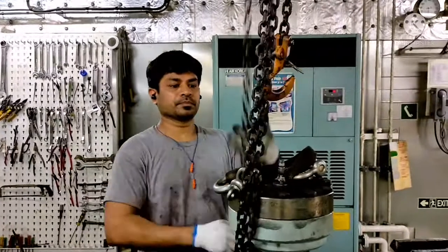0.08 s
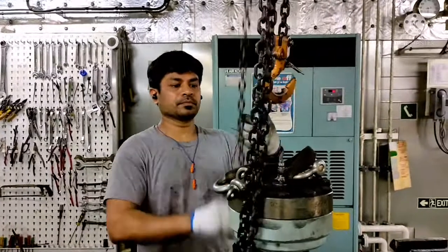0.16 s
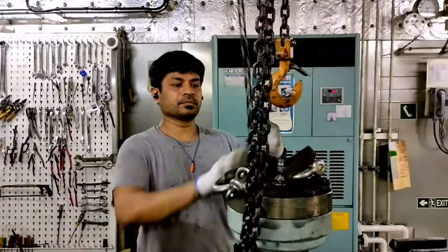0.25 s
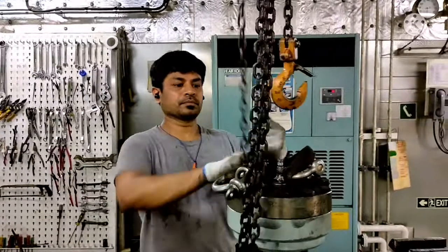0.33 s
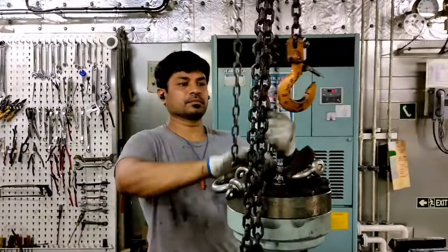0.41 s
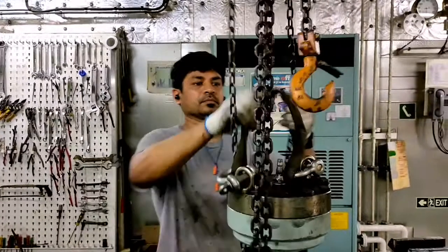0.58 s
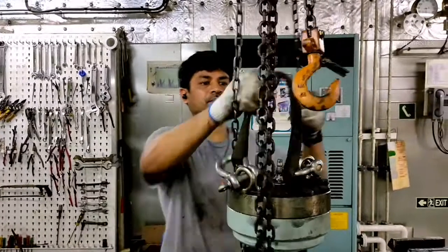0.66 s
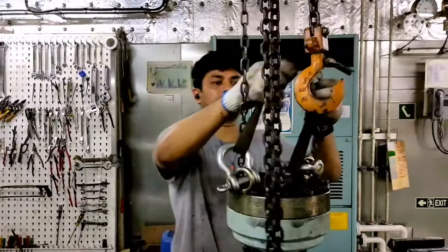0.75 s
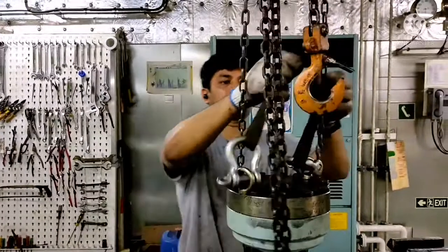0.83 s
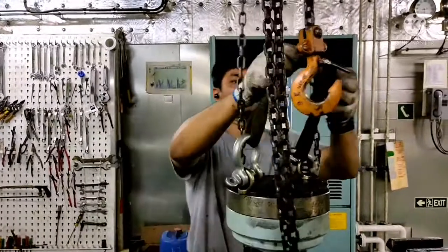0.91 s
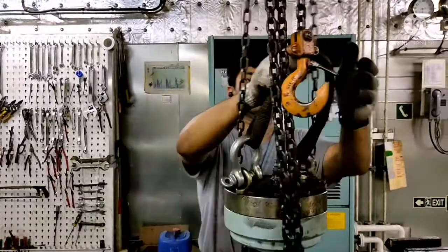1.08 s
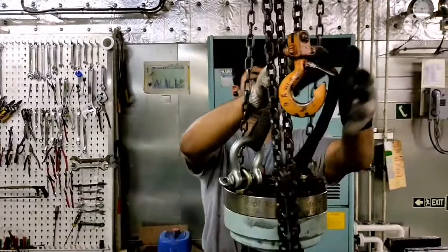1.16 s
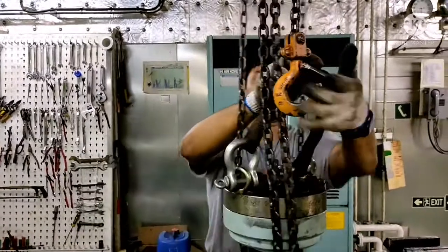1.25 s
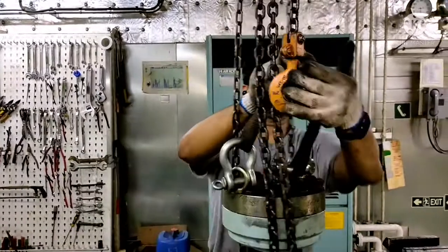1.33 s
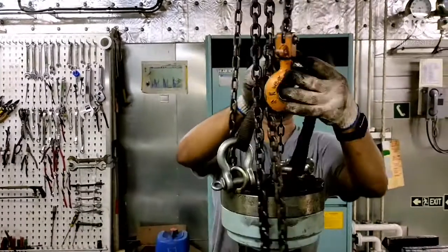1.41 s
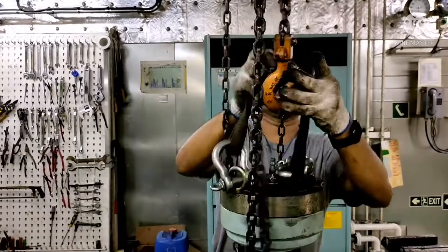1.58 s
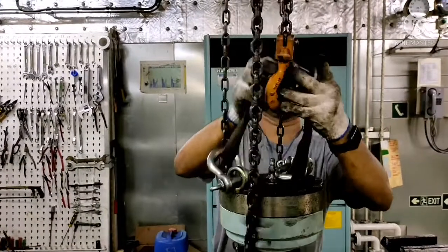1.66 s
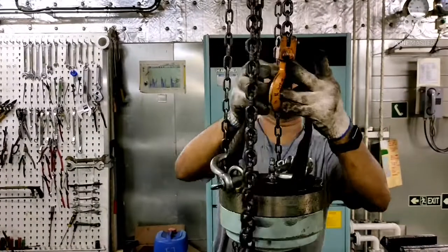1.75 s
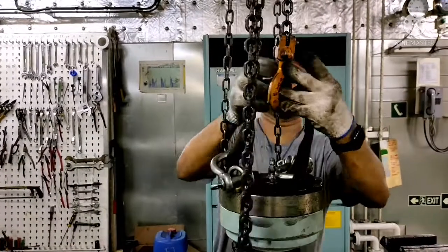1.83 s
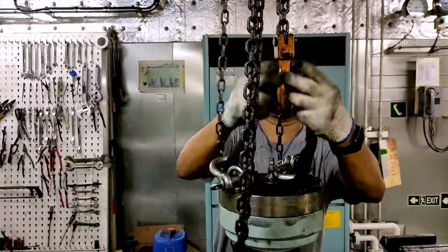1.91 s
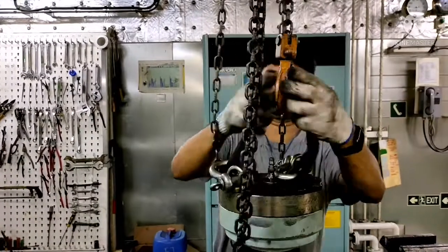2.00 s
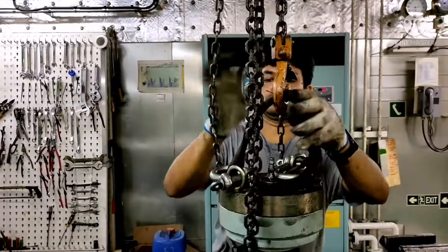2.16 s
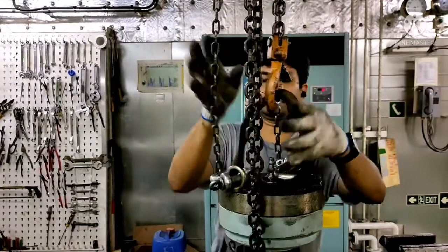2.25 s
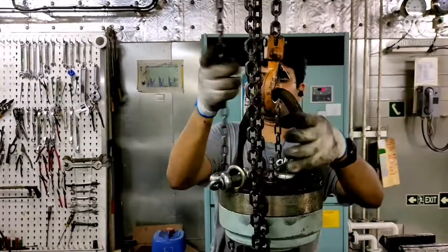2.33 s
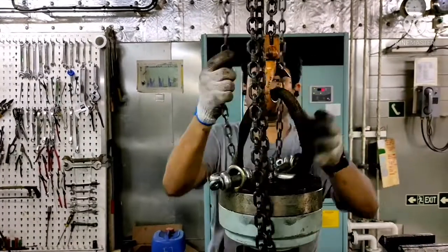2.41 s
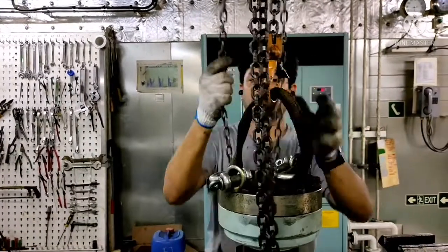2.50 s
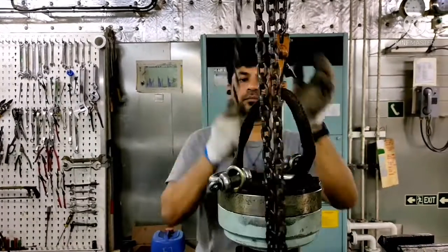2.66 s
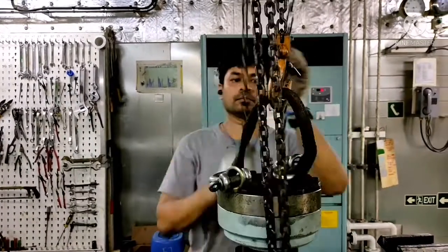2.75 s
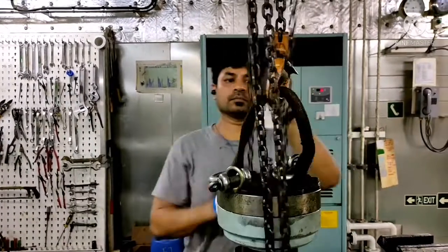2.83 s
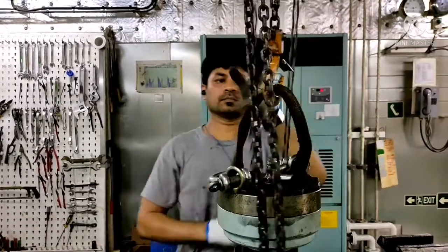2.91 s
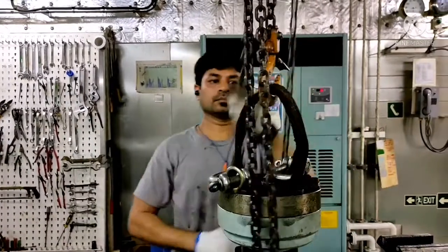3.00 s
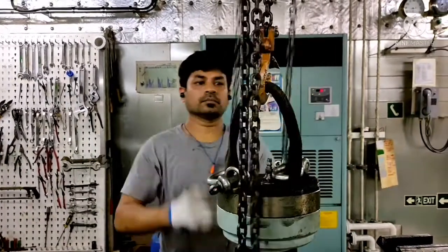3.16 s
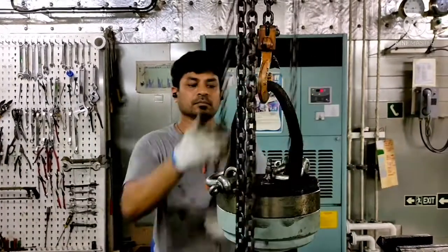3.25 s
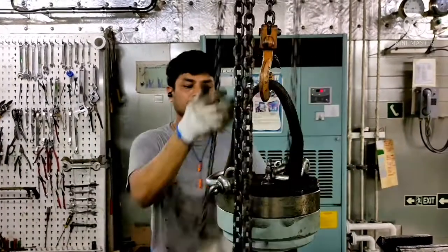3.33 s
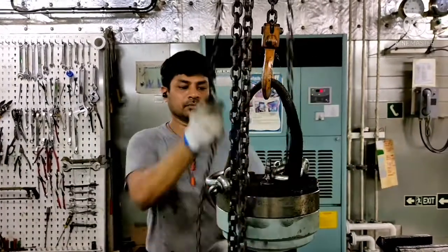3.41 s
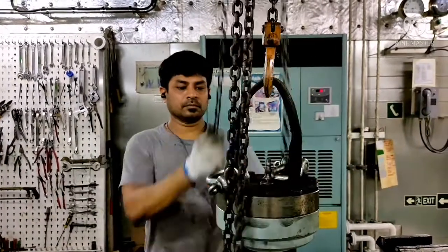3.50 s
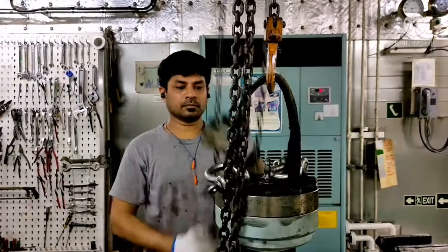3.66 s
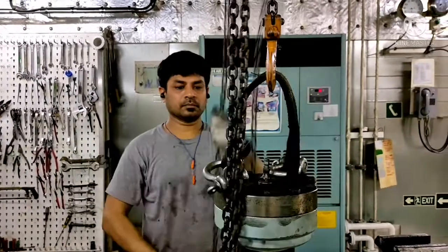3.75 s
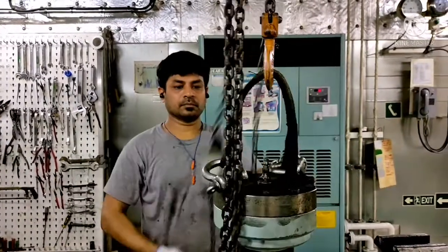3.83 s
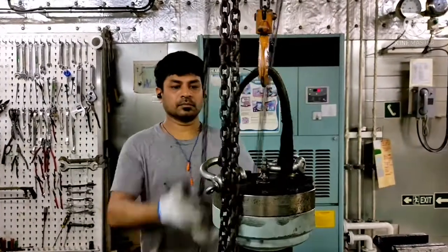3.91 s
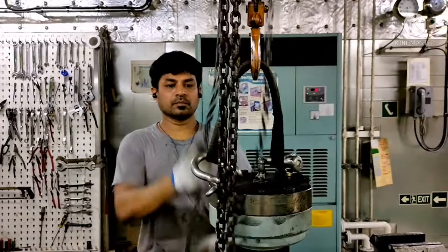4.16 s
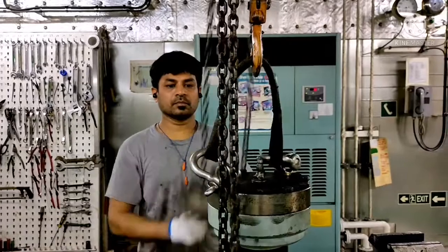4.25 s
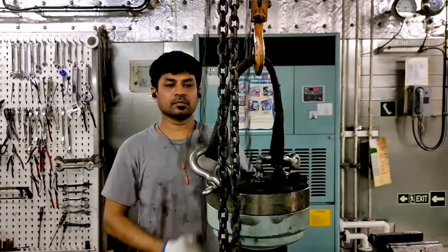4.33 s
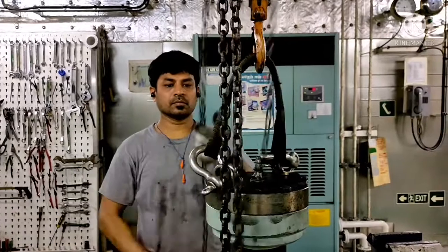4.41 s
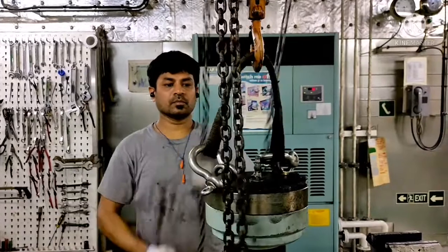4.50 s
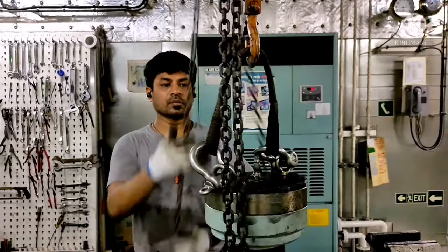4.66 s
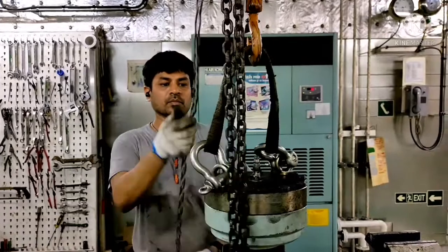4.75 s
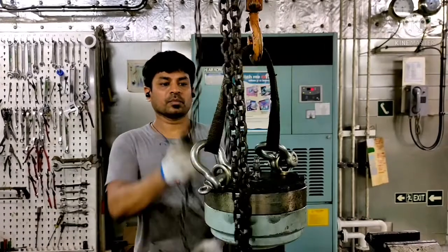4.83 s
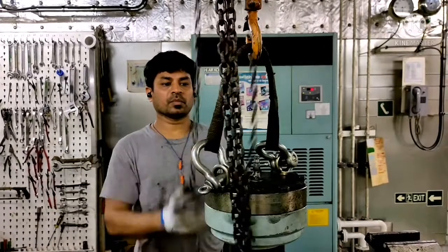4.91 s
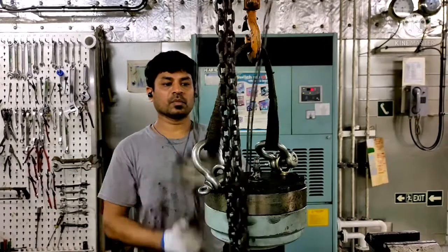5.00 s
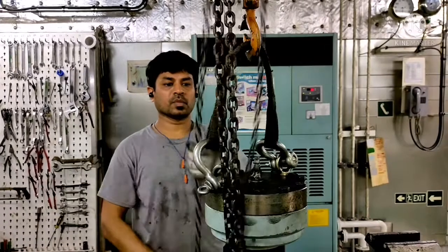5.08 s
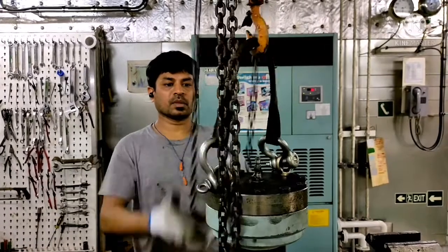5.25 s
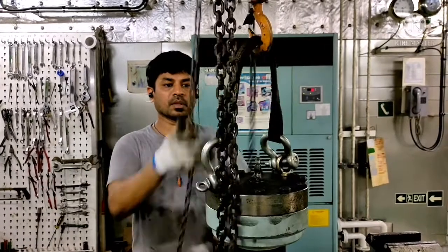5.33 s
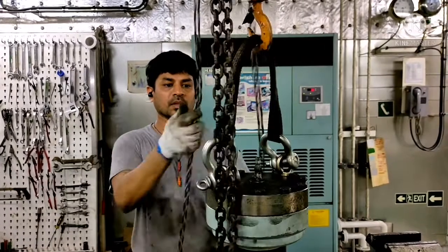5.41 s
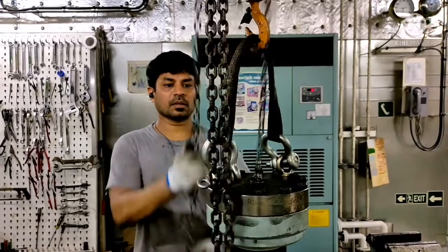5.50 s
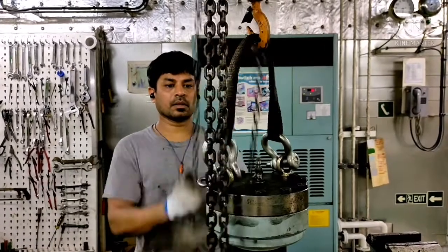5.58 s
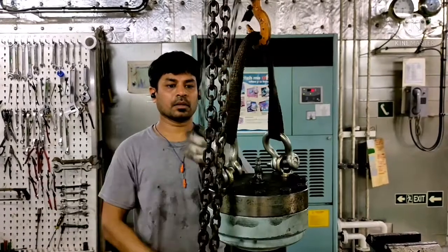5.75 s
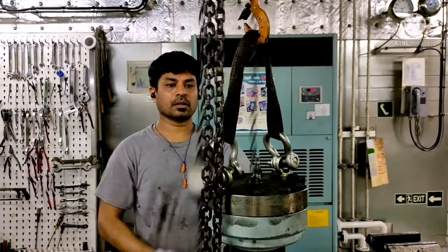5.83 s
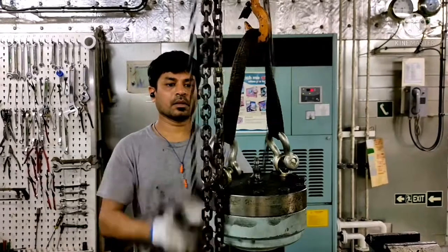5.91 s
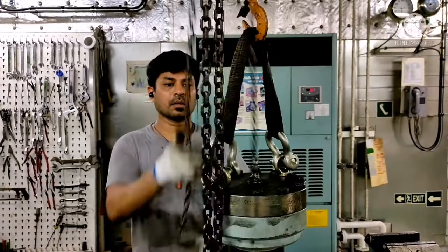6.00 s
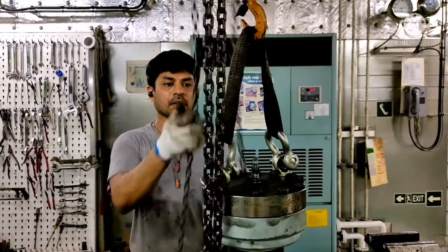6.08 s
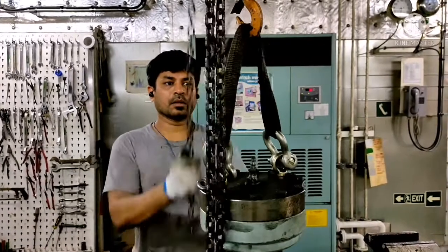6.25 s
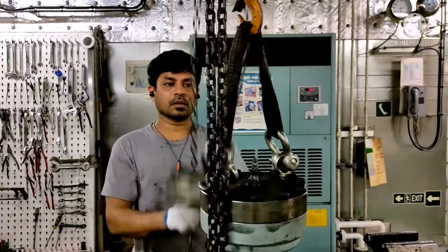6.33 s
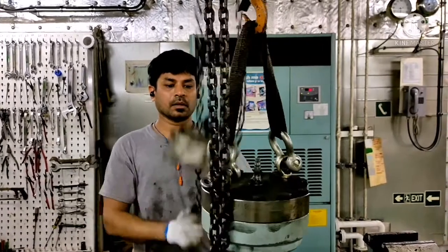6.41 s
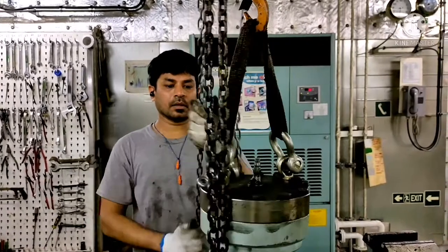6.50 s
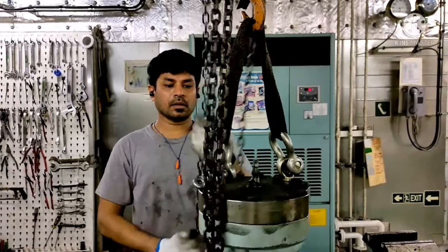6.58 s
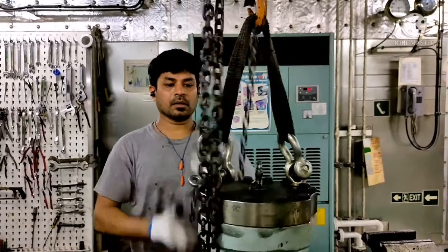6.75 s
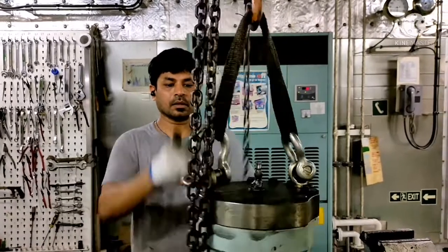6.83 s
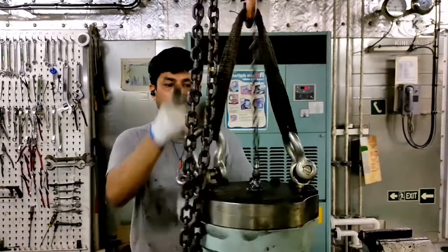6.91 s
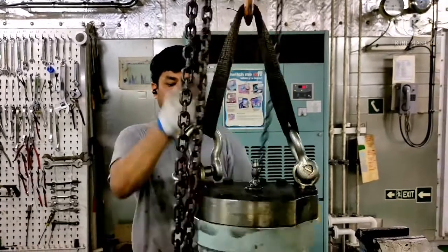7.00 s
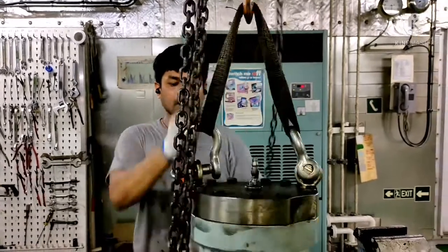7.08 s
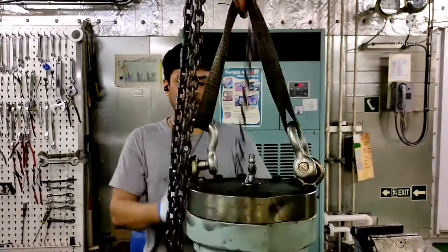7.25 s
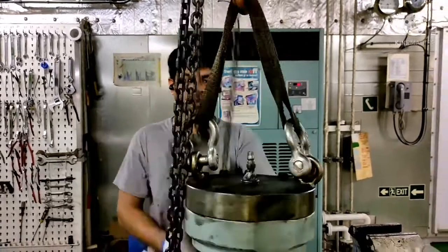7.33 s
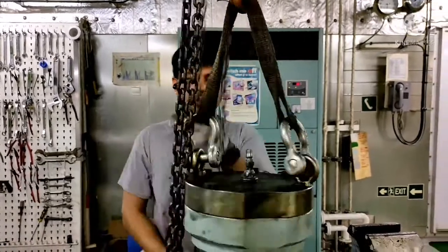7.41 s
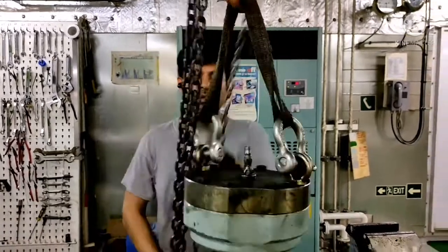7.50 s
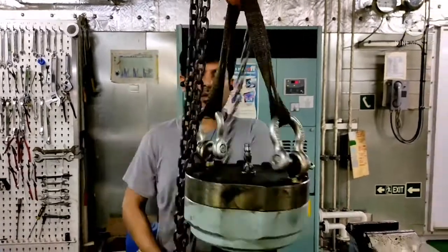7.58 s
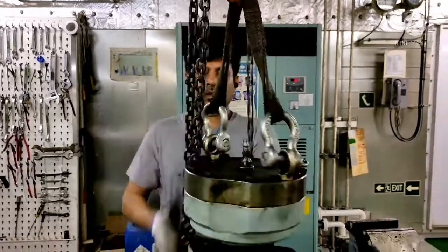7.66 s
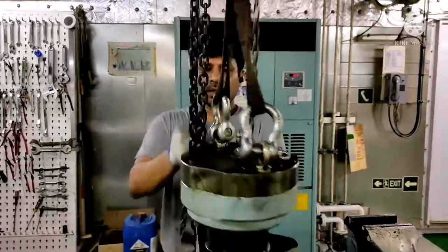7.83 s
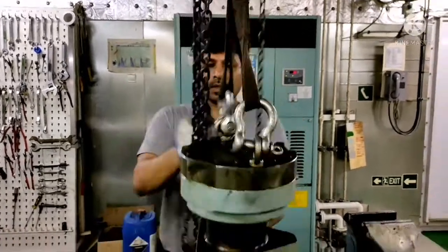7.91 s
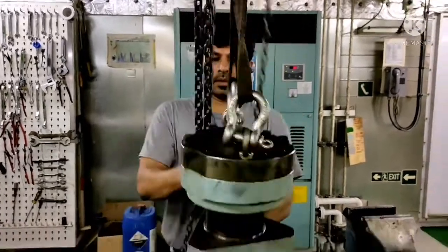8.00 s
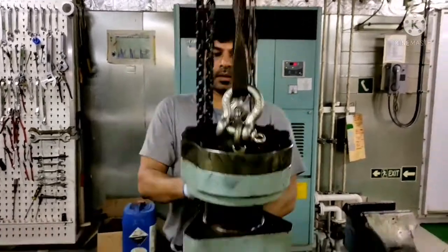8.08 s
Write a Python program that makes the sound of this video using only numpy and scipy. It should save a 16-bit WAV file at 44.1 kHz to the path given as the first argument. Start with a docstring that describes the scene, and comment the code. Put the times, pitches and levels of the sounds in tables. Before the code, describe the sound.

A chain hoist jingles briefly, pauses while hook and shackles clink, then rattles hand over hand over a low ship's machinery hum.

```python
"""A chain hoist runs in a ship's steel workshop, over a diesel generator, motors and vents: summed sines and noise.
First the chain jingles, as random impacts that excite short modes, and slows to a rest. In the pause a sling
is hooked on: hook and shackles clink as decaying modes, slack chain brushes them and the load bumps. Then the
chain is hauled hand over hand: a dense jingle, hollow knocks in the hand wheel's housing from short swelling
sines, and bright clacks of filtered noise as links snap taut."""
import sys
import numpy as np
from scipy import signal
from scipy.fft import rfft, irfft
from scipy.io import wavfile
from scipy.ndimage import uniform_filter1d

SR = 44100
rng = np.random.default_rng(int(sys.argv[2]) if len(sys.argv) > 2 else 0)


def to_wav(sig):
    """Store sig (one row per channel, or 1-D mono) as 16-bit WAV at the path in sys.argv[1].

    Samples outside -1..1 are clipped; the rate is SR.
    """
    pcm = np.clip(np.atleast_2d(sig), -1, 1) * 32767
    pcm = np.round(pcm).astype(np.int16)
    wavfile.write(sys.argv[1], SR, pcm.T)  # frames by channels


N = 359414
T = np.arange(N) / SR
FREQS = np.maximum(np.arange(N // 2 + 1) * SR / N, 1)
SIDES = np.array([[1], [-1]])  # left, right

# The chain runs out, rests and is hauled again: one list per run.
# Each row: time in seconds, jingle level in dB.
HAUL_LEVELS = [
    [(0, -22), (.14, -23), (.37, -31), (.43, -28), (.55, -39), (.68, -51.5), (.8, -65)],
    [(2.54, -54), (2.58, -38.5), (2.6, -38), (2.68, -27), (2.79, -25), (3.21, -21.5), (5.54, -23.5),
     (5.59, -27.5), (5.66, -22), (6.55, -27), (6.77, -32), (6.9, -27), (7.2, -26.5), (7.4, -21.5),
     (7.62, -25), (7.91, -25.5), (7.98, -30), (8.15, -25)],
]
# Pulls that spin the hand wheel. Each row: start in seconds, length in seconds, level in dB.
WHEEL_PULLS = [(0.036, 0.11, -26), (0.405, 0.049, -37.5), (2.758, 0.09, -33.5), (2.857, .23, -29.5),
               (3.242, .23, -28), (3.546, .3, -25.5), (3.892, 0.074, -24), (4.051, .16, -25),
               (4.25, 0.3, -24.5), (4.622, .1, -25), (4.791, 0.053, -24), (4.898, .3, -25),
               (5.311, .22, -25), (5.632, .24, -23), (5.963, 0.13, -25.5), (6.296, 0.03, -35.5),
               (6.46, 0.073, -31.5), (6.73, 0.041, -36), (6.875, .16, -30), (7.257, .1, -30.5),
               (7.388, .31, -33.5), (7.857, .08, -30.5), (8.091, .06, -36.5)]


def undb(db):
    """Decibels are logarithmic: 20 dB is a factor of ten in amplitude."""
    return 10 ** (np.asarray(db) / 20)


def unit(x):
    """Normalization of the signal to a root mean square of one."""
    return x / np.sqrt(np.mean(x ** 2))


def energy(x):
    """Normalization of a stereo impulse response to unit energy per ear, averaged over both ears."""
    return x / np.sqrt(np.sum(x ** 2) / 2)


def curve(points):
    """Linear interpolation in time between (s, value) points."""
    times, values = np.transpose(points)
    return np.interp(T, times, values)


def loudness(tables):
    """Amplitude envelope from (s, dB) tables, silent outside them and smoothed at the edges."""
    gain = 0
    for table in tables:
        active = (T >= table[0][0]) * (T <= table[-1][0] + .01)
        gain = gain + undb(curve(table)) * active
    return np.abs(uniform_filter1d(gain, size=200))


def gestures(table, attack_s, release_s, arch_db):
    """Power sum of hand movements: each rises exponentially, arches over its length and decays."""
    power = 0
    for start, length, db in table:
        progress = np.clip((T - start) / length, 0, 1)
        before = np.maximum(start - T, 0) / attack_s
        after = np.maximum(T - start - length, 0) / release_s
        # strongest halfway through
        arch = undb(db - arch_db * (2 * progress - 1) ** 2)
        power = power + (arch * np.exp(-np.minimum(before + after, 20))) ** 2
    return np.sqrt(power)


def wander(rate):
    """Low-pass random drift with a spread near one: a new random target rate times a second."""
    k = int(SR / rate)
    steps = np.repeat(rng.standard_normal(N // k + 1), k)
    return np.sqrt(3 / 2) * uniform_filter1d(steps, k)[:N]


def fade(t, t60):
    """Exponential decay by 60 dB in t60 seconds."""
    return np.exp(-np.log(1000) * t / t60)


def slope(points):
    """Magnitude response through (Hz, dB) points, interpolated over logarithmic frequency."""
    hz, db = np.transpose(points)
    return undb(np.interp(np.log(FREQS), np.log(hz), db))


def resonance(hz, width_hz):
    """Complex response of a damped resonator with one degree of freedom."""
    return 1 / (1 + 1j * (FREQS / hz - hz / FREQS) * hz / width_hz)


def shape(x, response):
    """Linear filtering: the spectrum is multiplied by a frequency response."""
    return irfft(rfft(x) * response, N)


def colour(x, response):
    """Linear filtering scaled to keep the power of white noise."""
    return shape(x, response / np.sqrt(np.mean(np.abs(response) ** 2)))


def ring(x, response):
    """Convolution of an excitation with a stereo impulse response."""
    return signal.oaconvolve(np.atleast_2d(x), response, axes=1)[:, :N]


def add(out, s, sound):
    """Superposition of a sound at a time in seconds."""
    i = max(int(s * SR), 0)
    out[..., i:i + sound.shape[-1]] += sound[..., :N - i]


def room(x, wet_db, t60):
    """Reverberation: steel walls add a diffuse tail, uncorrelated between the ears."""
    t = T[:SR // 2]
    build_up = np.clip(t / 0.0079 - .5, 0, 1)
    tail = rng.standard_normal((2, len(t))) * fade(t, t60) * build_up
    return x + undb(wet_db) * ring(x, energy(tail))


def contacts(rate, scatter_db):
    """Random impulse process of uneven impacts, rate a second, normalized to an rms of one."""
    size = undb(scatter_db * np.clip(rng.standard_normal(N), -1.7, 1.7))
    hits = rng.random(N) < rate / SR
    # dividing by the root of the rate keeps the power even while the rate changes
    return unit(hits * size * rng.choice([-1, 1], N) / np.sqrt(rate))


def links(gain, rate, scatter_db, crack_t60, ring_t60, ring_db, wet_db, count=24):
    """Impact excitation: groups of colliding links, each with its own crack, modes and path round the room."""
    t, out = T[:SR // 3], 0
    for _ in range(count):
        hz = rng.uniform(3000, 8000, size=(14, 1))
        phase = 2 * np.pi * (hz * t + rng.random(size=(2, 14, 1)))
        modes = np.sin(phase).sum(axis=1) * fade(t, ring_t60)
        crack, tail = rng.standard_normal((2, 2, len(t)))
        crack = crack * fade(t, crack_t60)
        tail = tail * fade(t, 0.17) * np.minimum(t / 0.02, 1)
        response = energy(crack) + undb(ring_db) * energy(modes) + undb(wet_db) * energy(tail)
        out = out + ring(gain * contacts(rate / count, scatter_db), energy(response))
    return out / np.sqrt(count)


def knock(hz, rise_s):
    """Transient resonance: the steel swells into its note, peaks after rise_s and dies away."""
    t = T[:SR // 6]
    return (t / rise_s * np.exp(1 - t / rise_s)) ** 2 * np.sin(2 * np.pi * hz * t)


def machinery():
    """Harmonic series of the generator's working cycle, steady motor tones and broadband vent noise."""
    cycle_hz = 5.99
    # Diesel generator, heard through the deck. Each row: multiple of the working cycle, rms level in dB
    # before the stereo balance.
    diesel = [(5, -63.5), (6, -58), (7, -60.5), (8, -47.5), (12, -68.5), (13, -62), (14, -53.5), (15, -63),
              (16, -62), (17, -53), (18, -60.5), (20, -83), (22, -67), (23, -58), (24, -55.5), (27, -61.5),
              (28, -59), (31, -58.5), (32, -67), (35, -64.5), (37, -66.5), (38, -76.5), (43, -67.5),
              (46, -67), (48, -61), (59, -77.5), (60, -76)]
    # Electric motors and pumps. Each row: frequency in Hz, rms level in dB before the stereo balance.
    motors = [(52, -60), (59.3, -50.5), (196, -62.5), (246.6, -52)]
    # Colour of the ventilation. Each row: frequency in Hz, relative level in dB.
    vent_colour = [(20, -4.5), (50, 6), (150, 1), (300, 0.5), (450, -0.5), (750, -8.5), (1200, -13.5),
                   (1700, -29), (3500, -34.5), (7000, -28.5), (8000, -44.5)]
    tones = [(k * cycle_hz, db) for k, db in diesel] + list(motors)
    hum = 0
    for hz, db in tones:
        # higher tones reach the two ears less alike
        ear_phase = SIDES * rng.standard_normal() * hz / 700
        phase = 2 * np.pi * (hz * T + rng.random()) + ear_phase
        hum = hum + np.sqrt(2) * undb(db) * np.sin(phase)
    mid, side = rng.standard_normal((2, N))
    spectrum = slope(vent_colour)
    width = np.minimum(0.11 + FREQS / 900, .85)
    air = shape(mid, spectrum) + SIDES * shape(side, spectrum * width)
    return (hum + unit(air) * undb(-48)) * undb(-.6 * SIDES)


def sway(table, rest_db):
    """Power sum of the slack chain's movements and its faint stirring in the pause."""
    paused = (T > .45) & (T < 2.6)
    moves = gestures(table, attack_s=0.048, release_s=.04, arch_db=2)
    return np.hypot(moves, undb(rest_db) * paused)


def clinks():
    """Modal synthesis: a contact on hook or shackle excites decaying modes and favours those near one pitch."""
    # Each row: time in seconds, level in dB, left minus right in dB, favoured mode in Hz.
    clink_hits = [(.665, -42, 6, 3950), (.795, -48, 8, 3500), (.9423, -40, 9, 5760), (.946, -37, 9, 4590),
                  (1.0854, -50, 14, 6690), (1.1119, -47, 14, 7140), (1.254, -45, 12, 5890),
                  (1.8213, -54, 16, 4900), (2.1445, -50, -2, 7140), (2.3141, -50, 15, 5020),
                  (2.4758, -42, 0, 3500), (2.5431, -30, 8, 3500), (2.5835, -21, 5, 3500),
                  (2.612, -26, 5, 3500), (2.636, -33, 2, 2040), (2.657, -23, 5, 3500)]
    # Ring of hook and shackles. Each row: frequency in Hz, relative level in dB, 60 dB decay in seconds.
    hook_modes = [(1540, -25, 0.26), (1990, -3, 0.34), (3610, 7, 0.051), (4200, 10, 0.11), (4590, -30, .18),
                  (4930, 9.5, 0.043), (5020, 16, 0.13), (5803, 18, 0.043), (5700, -35, 0.162),
                  (5940, 29.5, 0.023), (7050, 23.5, 0.021), (7140, -16, .14), (7540, -4, 0.031)]
    out, t = np.zeros((2, N)), T[:SR // 2]
    for s, db, pan_db, favoured_hz in clink_hits:
        clink = 6 * rng.standard_normal((2, len(t))) * fade(t, .04)
        for hz, mode_db, t60 in hook_modes:
            # each point of contact boosts the modes near one pitch and shifts every mode a little
            favour = 1 + 7 * np.exp(-((hz - favoured_hz) / 280) ** 2)
            detune = 1 + .014 * rng.standard_normal()
            phase = hz * detune * t + rng.random(size=(2, 1))
            clink += favour * undb(mode_db) * np.sin(2 * np.pi * phase) * fade(t, t60)
        add(out, s, clink / np.abs(clink).max() * undb(db + 3 + SIDES * pan_db / 2))
    return out


def brushing():
    """Resonant filtering of many light impacts: the slack chain brushes the hook."""
    # Each row: start in seconds, length in seconds, level in dB.
    brush_moves = [(.45, 0.35, -57), (.84, 0.24, -59), (1.24, 0.11, -64.5), (1.7, 0.19, -64),
                   (2.32, .1, -70)]
    # Resonances that the chain stirs. Each row: frequency in Hz, width in Hz, relative level in dB.
    brush_modes = [(1462, 17, 2.5), (2470, 47, -14), (4200, 140, -15), (4880, 77, -1.5), (5700, 250, -14.5),
                   (6600, 210, -23)]
    gain = sway(brush_moves, rest_db=-70.5)
    brush = links(gain, rate=110, scatter_db=9.5, crack_t60=0.007, ring_t60=.08, ring_db=-21,
                  wet_db=-7.0, count=4)
    steel = sum(undb(db) * resonance(hz, width_hz) for hz, width_hz, db in brush_modes)
    touch_db = 3 * wander(rate=12)
    return colour(brush, steel * resonance(2900, 6000)) * undb(-4.5 + touch_db + 4.7 * SIDES)


def nudging():
    """Resonant filtering of random impacts: the slack chain sways and nudges the tackle."""
    # Each row: start in seconds, length in seconds, level in dB.
    nudge_moves = [(.45, 0.11, -40), (.66, 0.1, -44.5), (.93, 0.057, -44.5), (1.07, 0.11, -46.5),
                   (1.34, 0.091, -46), (1.57, 0.2, -50.5), (2.04, 0.17, -44.5), (2.34, 0.041, -47.5),
                   (2.52, 0.25, -47.5)]
    body = resonance(664, 280) ** 3 + 0.11 * resonance(1260, 250) ** 3
    nudges = shape(contacts(rate=200, scatter_db=2), body)
    return unit(nudges) * sway(nudge_moves, rest_db=-58) * undb(-3.5)


def tackle():
    """Superposition in a reverberant room: clinks, brushing, nudges and the bumps of load and tackle."""
    # Each row: time in seconds, peak level in dB before the room, pitch in Hz.
    bump_hits = [(.60, -37, 482), (0.692, -45.5, 1044), (0.939, -51, 1446), (1.085, -37.5, 583),
                 (1.405, -41, 684), (1.49, -47, 1020), (1.92, -46.5, 1102), (2.06, -50, 1516),
                 (2.085, -41, 660), (2.17, -35.5, 624), (7.768, -33.5, 437), (7.773, -38, 1155),
                 (7.822, -37, 462)]
    out = clinks() + brushing() + nudging()
    for s, db, hz in bump_hits:
        add(out, s, undb(db) * knock(hz, rise_s=0.0092))
    return room(out, wet_db=-0.5, t60=0.27)


def snaps():
    """Impulsive radiation: a link jerks tight with a hard, bright clack a few milliseconds long."""
    # Each row: time in seconds, level in dB.
    taut_links = [(5.0225, -18), (5.6705, -17), (6.5235, -20), (6.726, -18), (6.803, -17), (6.8738, -17),
                  (6.904, -15), (6.931, -17), (6.9765, -20), (7.1425, -18)]
    out, t = np.zeros((2, N)), T[:SR // 20]
    swell = t / .0012 * np.exp(1 - t / .0012)
    for s, db in taut_links:
        clack = rng.standard_normal((2, len(t))) * swell
        add(out, s, clack * undb(db - 5.5 + 1.3 * SIDES))
    bright = resonance(5400, 2000) * resonance(6000, 5000)
    return room(colour(out, bright), wet_db=-21.5, t60=0.43)


def wheel_knocks(pull):
    """Near-periodic impacts: in a pull, link after link drops into the wheel; rows of (s, dB, Hz)."""
    # Links that hit the housing hardest. Each row: time in seconds, level in dB, pitch in Hz.
    hard_knocks = [(.049, -19, 780), (2.932, -18.5, 760), (3.392, -14, 780), (3.664, -13, 820),
                   (3.756, -11, 760), (3.902, -14.5, 720), (4.306, -11, 756), (4.632, -12, 766),
                   (4.902, -14, 758), (4.939, -13.5, 730), (5.011, -11.5, 834), (5.091, -12, 760),
                   (5.376, -14, 760), (5.736, -11, 805), (5.997, -11, 780), (6.022, -10.5, 775),
                   (6.524, -18, 787), (6.804, -23, 704), (6.874, -22, 710), (7.322, -20, 740),
                   (7.916, -19, 700)]
    links_per_s, jitter_s = 34.3, .003
    rows = list(hard_knocks)
    chance = rng.standard_normal(size=(len(WHEEL_PULLS), 16, 3))
    for (start, length, _), draws in zip(WHEEL_PULLS, chance):
        for k, (late, strong, high) in enumerate(draws):
            s = start + k / links_per_s + jitter_s * late
            pocket_free = all(abs(s - hard[0]) > .5 / links_per_s for hard in hard_knocks)
            if k / links_per_s <= length and pocket_free:
                pull_db = 20 * np.log10(np.interp(s, T, pull))
                rows.append((min(s, T[-1]), pull_db + 8 + 2.5 * strong, 765 + 43 * high))
    return rows


def firm_knocks(pull):
    """Impact and resonance: each firm knock is a hollow note with a short rough crack of contact."""
    firm, t = np.zeros((2, N)), T[:SR // 20]
    for s, db, hz in wheel_knocks(pull):
        # the note starts slightly ahead of the crack
        add(firm, s - .0015, undb(db - 2.5) * knock(hz, rise_s=0.004))
        crack = rng.standard_normal((2, len(t))) * fade(t, .025)
        add(firm, s, crack * undb(db - 3 - 3 * SIDES))
    return firm


def hand_wheel(pull):
    """Cavity resonance: links drop into the wheel's pockets, firm knocks over a patter of lighter ones."""
    patter = np.array([contacts(200, 1.8), contacts(240, 2.7)])
    hollow = resonance(693, 110) * resonance(809.0, 90) * resonance(740, 550)
    # each ear also hears some of the other side
    patter = shape(patter + 0.38 * patter[::-1], hollow)
    # a softer patter goes on while the wheel coasts
    patter = unit(patter) * np.hypot(pull * undb(-6.5), loudness(HAUL_LEVELS) * undb(-20))
    # the housing's second note
    overtone = np.array([contacts(200, 2.5), contacts(200, 3.4)])
    overtone = shape(overtone + 0.15 * overtone[::-1], resonance(1113, 300) ** 2)
    overtone = unit(overtone) * pull * undb(-14.5)
    # the small cover radiates little below its lowest note
    cover = slope([(400, -18.5), (540, -7.5), (660, 2), (1400, -3), (2200, -15), (8000, -22)])
    wheel = shape(firm_knocks(pull) + patter + overtone, cover)
    return room(wheel * undb(-1.1 * SIDES), wet_db=-6.5, t60=0.2)


def casing_rattle(gain, pull, speed):
    """Modal response of the hoist's steel casing to the impacts of the chain."""
    # Each row: frequency in Hz, width in Hz (widened to at least 190), relative level in dB.
    casing_modes = [(1219, 140, -8.5), (1382, 74, 0.5), (1498, 57, 4), (2143, 230, 2), (2720, 490, -0.5)]
    # The casing rattles more as the chain takes up the load.
    # Each row: time in seconds, drive relative to the jingle in dB.
    rattle_share = [(0, -20.5), (2.6, -20.5), (3.5, -15), (5.3, -17), (6.1, -13), (7.3, -12), (8.15, -10)]
    shaking = np.hypot(gain * undb(curve(rattle_share)), pull * undb(-22))
    rattle = links(shaking, 400 * speed, scatter_db=3.0, crack_t60=0.013, ring_t60=0.023,
                   ring_db=-9.0, wet_db=-2.5, count=10)
    rattle = rattle + 0.23 * rattle[::-1]
    casing = 0
    for hz, width_hz, db in casing_modes:
        # as the chain swings it meets the casing at new places, so each mode swells and fades by itself
        swell_db = 2.4 * wander(rate=10)
        mode = resonance(hz, max(width_hz, 190)) ** 2
        casing = casing + colour(rattle, mode) * undb(db + swell_db)
    # a slow chain rings the casing a little more
    return casing * undb(-8.0 + 1.0 * (1 - speed) - SIDES * 0.65)


def hand_chain(pull):
    """Dense impact noise: the running chain jingles and rings hook and casing; slow, it makes fewer contacts."""
    # Colour of the jingling links. Each row: frequency in Hz, relative level in dB.
    jingle_colour = [(900, -46), (2000, -15), (2700, -11), (3300, -8), (3650, -5.5), (3900, -4.5),
                     (4700, -3), (4910, -1.5), (5120, -3.5), (6100, 2), (6800, 1.5), (7400, 3.5),
                     (7800, -7.5), (8300, -64.5)]
    # The links' lean to one side. Each row: frequency in Hz, left minus right in dB.
    link_lean = [(2000, 2.5), (3500, 3), (5000, 4), (6200, 5), (7100, -2), (7800, -8)]
    # Where the chain hangs. Each row: time in seconds, left minus right in dB.
    chain_swing = [(0, 0), (.6, 1.5), (2.6, 4), (3.2, 1.5), (4.2, 1), (5.2, 1.5), (6.2, 3), (6.8, 4.5),
                   (7.4, 2), (8.15, 3)]
    # The running chain keeps the hook ringing until it is lifted clear.
    # Each row: time in seconds, ring relative to the jingle in dB, before a fixed trim.
    hook_share = [(0, -5.5), (3, -10.5), (4.4, -6), (5.2, -24)]
    gain = loudness(HAUL_LEVELS)
    speed = np.clip(gain / undb(-23), .08, 1) ** .7  # relative, one at full speed
    stream = links(gain, 750 * speed, scatter_db=3.5, crack_t60=.013, ring_t60=0.077,
                   ring_db=-2.5, wet_db=-1, count=18)
    jingle = colour(stream, slope(jingle_colour) * slope(link_lean) ** (SIDES / 2))
    jingle = jingle * undb(-0.09 + SIDES * curve(chain_swing) / 2)
    hook = colour(stream, resonance(4875, 210) ** 2)
    hook = hook * undb(curve(hook_share) - 5.5 + 1.5 * SIDES)
    return jingle + hook + casing_rattle(gain, pull, speed)


def scene():
    """Superposition of the hoist and its tackle over the ship's hum."""
    pull = gestures(WHEEL_PULLS, attack_s=0.039, release_s=0.06, arch_db=2)
    return machinery() + tackle() + snaps() + hand_wheel(pull) + hand_chain(pull)


def record(dry):
    """Band limitation: a steep elliptic low-pass removes the treble above 7900 Hz."""
    low_pass = signal.ellip(10, .2, 80, 7900, fs=SR, output="sos")
    return signal.sosfilt(low_pass, dry)


dry = scene()
out = record(dry)
to_wav(out)
```